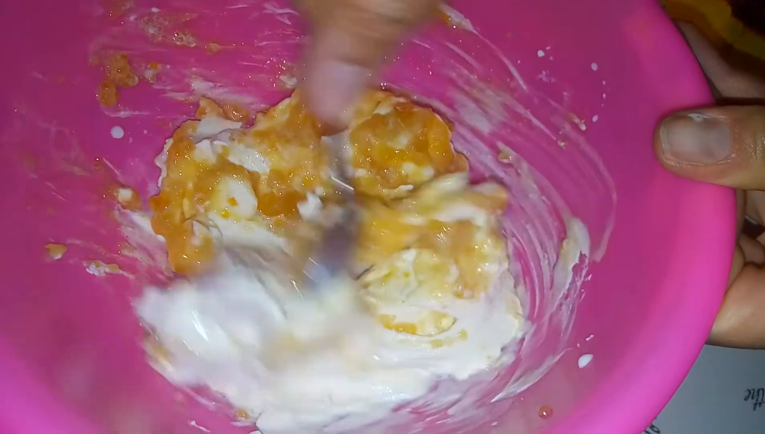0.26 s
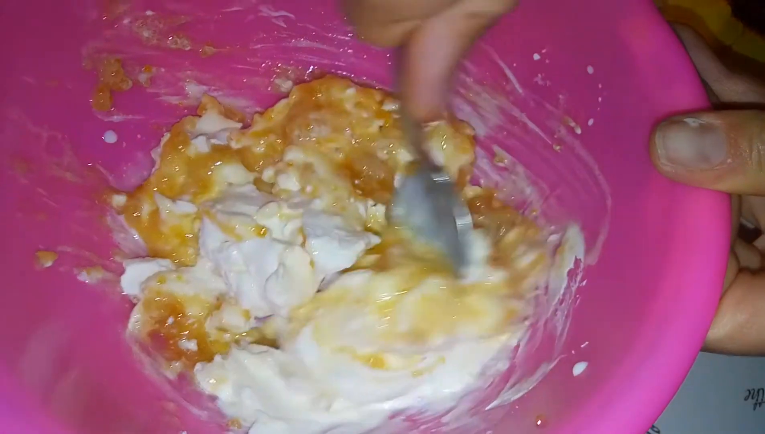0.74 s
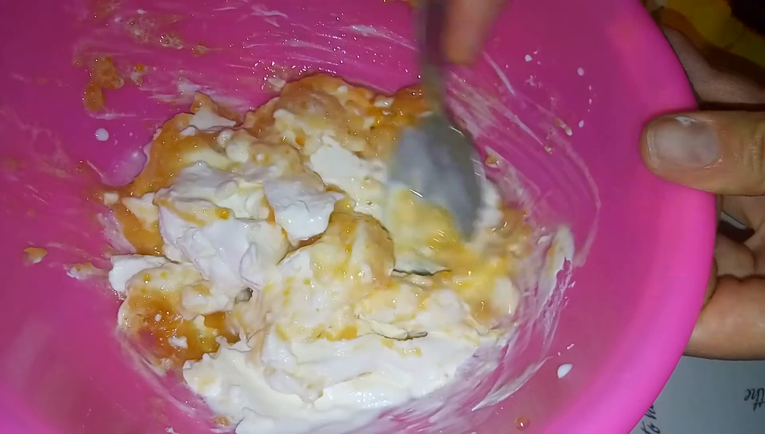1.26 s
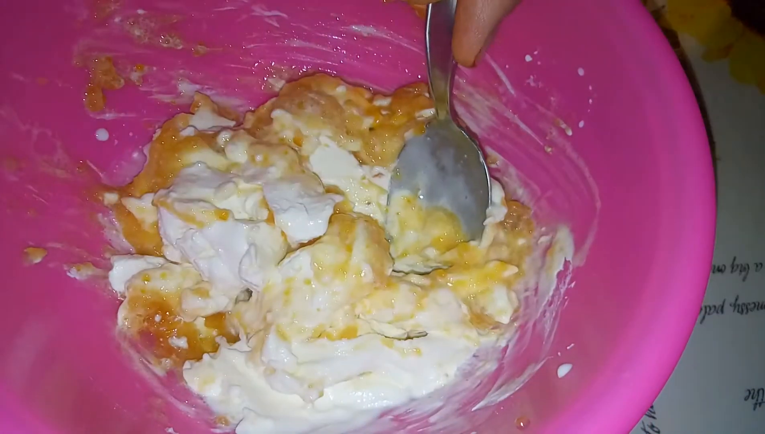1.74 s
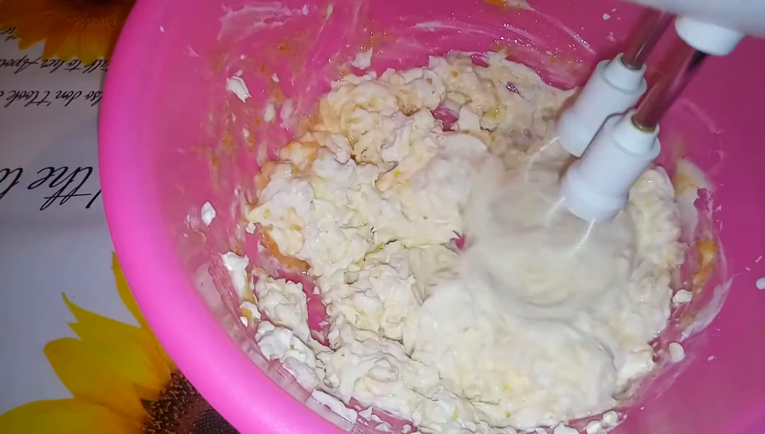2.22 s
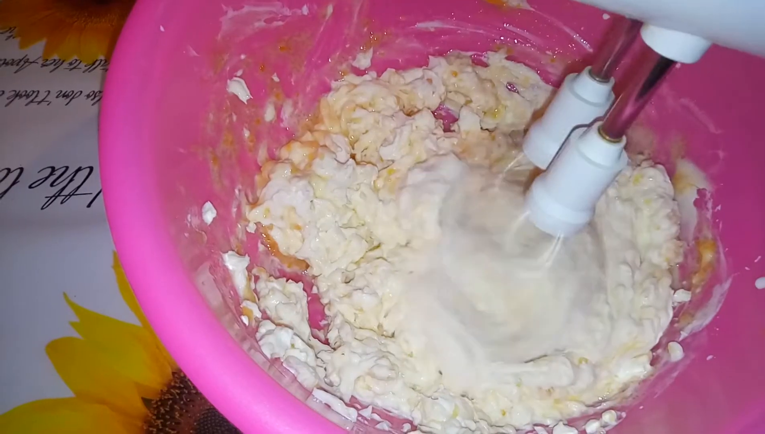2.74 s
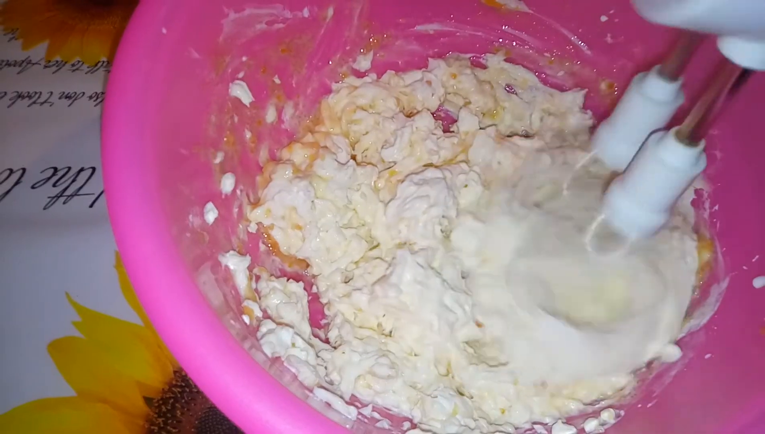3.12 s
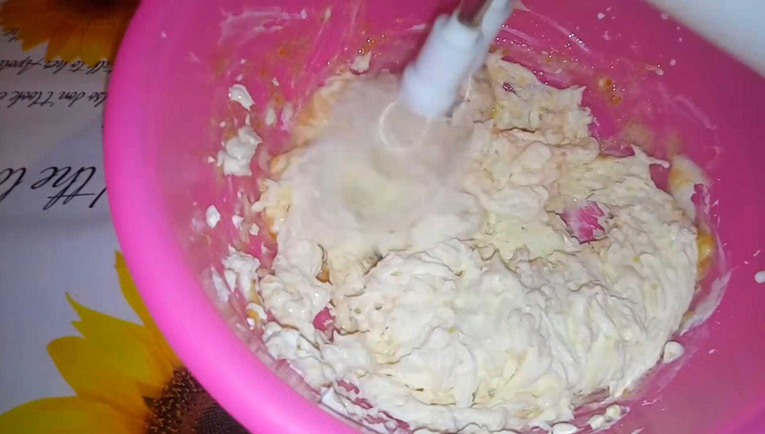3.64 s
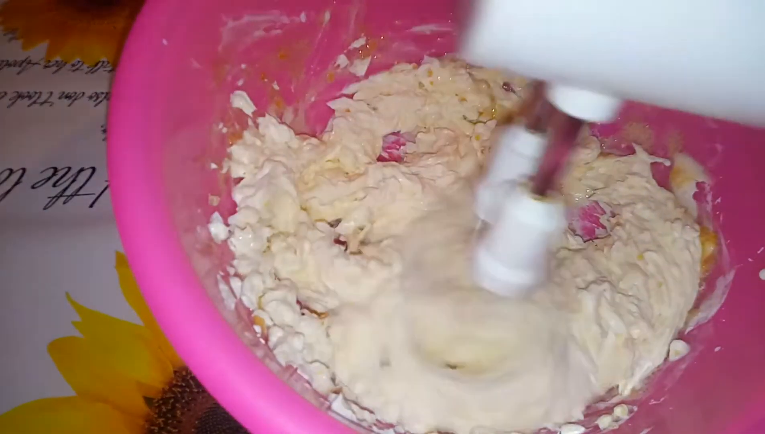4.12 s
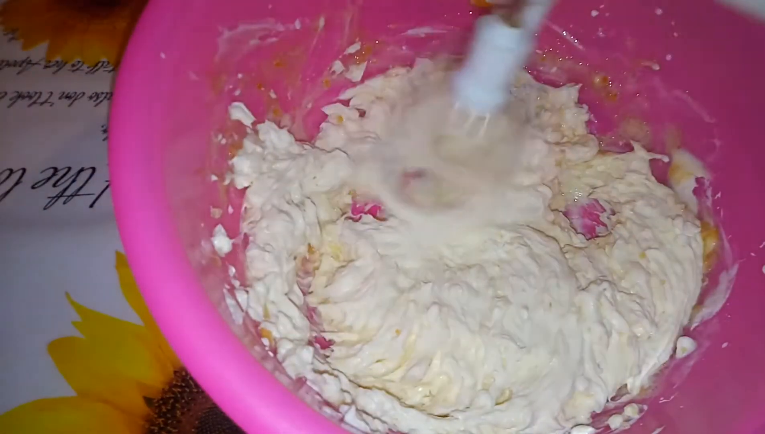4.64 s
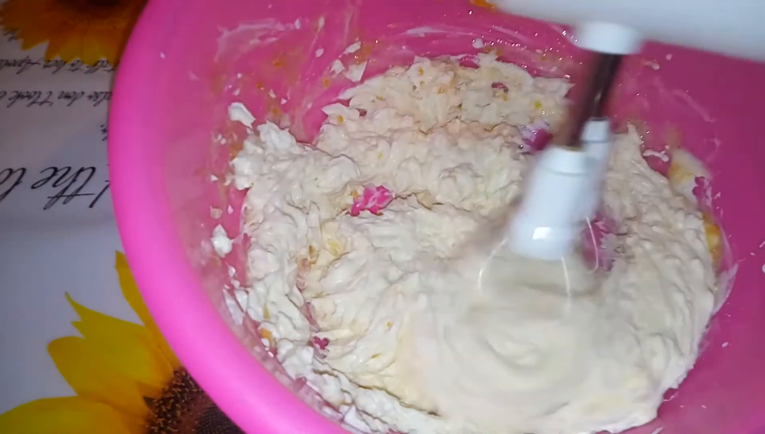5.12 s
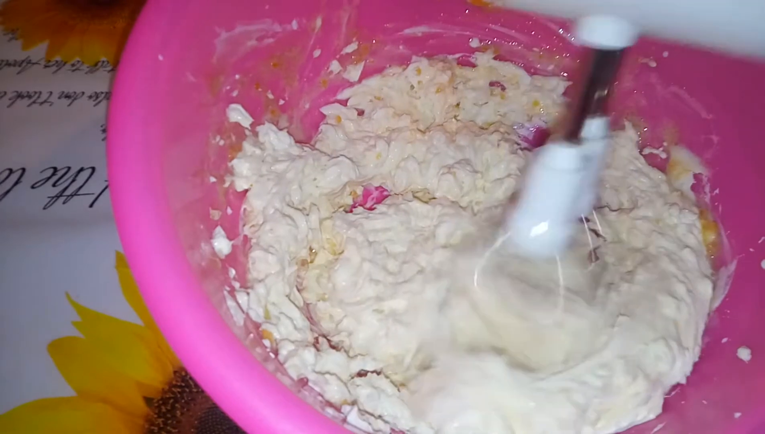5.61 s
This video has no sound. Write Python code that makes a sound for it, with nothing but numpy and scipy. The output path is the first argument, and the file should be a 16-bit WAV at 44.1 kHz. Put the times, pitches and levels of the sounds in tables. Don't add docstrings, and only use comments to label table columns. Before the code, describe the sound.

Quiet sticky stirring in a plastic bowl, then an abrupt electric mixer roar, a switch click, a rising whine, and low gusts buffeting the microphone.

```python
import sys
import numpy as np
from scipy import signal
from scipy.fft import rfft, irfft
from scipy.io import wavfile
from scipy.ndimage import uniform_filter1d

SR = 44100
rng = np.random.default_rng(int(sys.argv[2]) if len(sys.argv) > 2 else 0)


def persist_wave(psi):
    counts = np.round(np.clip(psi, -1, 1) * 32767).astype(np.int16)
    wavfile.write(sys.argv[1], SR, np.atleast_2d(counts).T)


def amplitude_ratio(level_db):
    exponent = np.asarray(level_db, float) / 20
    return 10 ** exponent


N = 258867
TIME_S = np.arange(N) / SR


def evened(x):
    return x / np.sqrt(np.mean(x ** 2) + 1e-20)


def read(points, hz):
    f, value = np.transpose(points)
    return np.interp(np.log(hz + 1), np.log(f + 1), value)


def controls(rows):
    s, *columns = np.transpose(rows)
    is_open = (TIME_S > s[0]) & (TIME_S <= s[-1] + 0.003)
    gate = uniform_filter1d(is_open * 1.0, size=200)
    return gate, [np.interp(TIME_S, s, c) for c in columns]


def noise():
    return rng.standard_normal(N)


def coloured(x, points):
    gain = amplitude_ratio(read(points, np.fft.rfftfreq(N, 1 / SR)))
    return evened(irfft(rfft(x) * gain, N))


def resonate(x, hz, width_hz):
    turn = np.exp(2j * np.pi * np.cumsum(hz * np.ones(len(x))) / SR)
    r = np.exp(-np.pi * width_hz / SR)
    return 2 * (turn * signal.lfilter([1 - r], [1, -r], x / turn + 1e-18)).real


def wander(hz):
    return evened(signal.sosfilt(signal.butter(2, hz, fs=SR, output="sos"), noise()))


def tone(hz, db, rough=0.0):
    turns = np.cumsum(hz * np.ones(N)) / SR + rng.random() + 0.11 * rough * wander(36)
    return np.sqrt(2) * amplitude_ratio(db + 2.7 * rough * wander(40)) * np.sin(2 * np.pi * turns)


# pitch_hz, density_db_per_hz
AIR = [(20, -25.5), (60, -16.5), (130, -14), (385, -28.5), (800, -30.5), (1400, -35), (3500, -38.5),
       (6000, -41.5), (7500, -48.5), (8200, -59.5), (9500, -110)]
# pitch_hz, level_db
FRIDGE = [(593, -69), (1480, -76.5), (210, -71)]
AIR_DB, HUM_HZ, HUM_DB = -55.5, 100.7, -46
BEAT_S, BEAT_DIP_S, BEAT_DEPTH = 0.567, 0.26, 0.33


def kitchen():
    beat = 1 - BEAT_DEPTH * np.cos(2 * np.pi * (TIME_S - BEAT_DIP_S) / BEAT_S)
    hum = beat * tone(HUM_HZ, HUM_DB, 0.3)
    air = coloured(noise(), AIR)
    air = air - resonate(air, 92.7, 45)
    appliances = sum(tone(hz, db, 0.38) for hz, db in FRIDGE)
    return amplitude_ratio(AIR_DB + 0.4 * wander(4.4)) * air + hum + appliances


# time_s, level_db
SCRAPE = [
    (0.0, -52.5),
    (0.382, -74),
    (0.588, -54),
    (0.69, -59.5),
    (1.31, -58),
    (1.6, -63),
]


def scrape():
    gate, (db,) = controls(SCRAPE)
    grain = noise() * amplitude_ratio(2.0 * wander(150))
    cream = [(150, -60), (400, -8), (1500, -1.5), (3500, -2), (6000, -11), (7800, -50), (9000, -100)]
    return gate * amplitude_ratio(db - 6.0) * coloured(grain, cream)


# start_s, peak_db, ring_hz, width_hz, thud_rel_db
TICKS = [(0.1201, -44.5, 1880, 2500, 3), (0.131, -39.5, 3630, 1500, -2), (0.1714, -47, 4910, 2500, -22),
         (0.182, -39.5, 3420, 2000, -16), (0.2254, -42.5, 4330, 2500, -24),
         (0.3505, -37.5, 2740, 1300, -20), (0.37, -44, 2750, 1200, -17), (0.5208, -36, 3760, 1800, -27),
         (0.5422, -34.5, 4400, 2200, -36), (0.5909, -30.5, 3170, 2800, -22), (0.6674, -40, 5980, 2500, -17),
         (0.677, -33, 2050, 2600, -2), (0.694, -45, 3970, 2000, 1), (0.7842, -39.5, 2570, 1100, -20),
         (0.87, -40.5, 3500, 4000, -2), (0.8907, -41, 2600, 900, -9), (0.937, -41, 4800, 2800, -10),
         (1.049, -51, 3760, 900, -16), (1.0767, -38, 3500, 1400, -21), (1.1169, -47, 3450, 2500, -24),
         (1.173, -25, 3880, 1680, -35), (1.3525, -37.5, 3020, 1500, 2), (1.3724, -22.5, 1820, 2400, -15),
         (2.035, -44, 3000, 3500, 2)]
TICK_T60_S, TICK_RISE_S = 0.022, 0.00042
TICK_CLICK = 4.0


def ticks():
    out, t = np.zeros(N + 4000), np.arange(4000) / SR
    for s, db, hz, width, thud_db in TICKS:
        crack = rng.standard_normal(len(t)) * amplitude_ratio(-60 * t / TICK_T60_S) * np.minimum(t / TICK_RISE_S, 1)
        crack[8] += TICK_CLICK
        ring = resonate(resonate(crack, hz, width), hz, width)
        body = resonate(ring, hz, 2 * width) + 0.056 * crack
        thud = resonate(resonate(crack, 890, 1600), 890, 1600)
        sound = body / abs(body).max() + amplitude_ratio(thud_db) * thud / abs(thud).max()
        out[round(s * SR):][:len(t)] += amplitude_ratio(db) * sound
    return signal.sosfilt(signal.butter(6, 7000, fs=SR, output="sos"), out[:N])


# pitch_hz, t60_s
KITCHEN = [(500, 0.22), (1300, 0.16), (2300, 0.17), (3800, 0.14), (7000, 0.064)]


def room(x):
    taps = np.zeros(SR // 2)
    at = np.arange(150, SR // 2 - 20, 20)
    taps[at + rng.integers(0, 20, len(at))] = rng.choice([-1.0, 1.0], len(at))
    hz, t, z = signal.stft(taps, SR, nperseg=256)
    t60_s = np.clip(read(KITCHEN, hz), 0.05, 0.6)[:, None]
    tail = signal.istft(z * amplitude_ratio(-60 * t / t60_s), SR, nperseg=256)[1]
    return signal.fftconvolve(x, tail / np.linalg.norm(tail))[:N]


def echoes(taps):
    sway = 2 * np.pi * 2.92 * TIME_S
    return amplitude_ratio(-10.5) * (room(taps * np.cos(sway)) + room(taps * np.sin(sway)))


THUMP_CYCLES = 0.56


def shoves(events):
    out, t = np.zeros(N + 3000), np.arange(3000) / SR
    for s, db, hz in events:
        u = t * hz / THUMP_CYCLES
        cycles = np.sin(2 * np.pi * (hz * t * (1 - 6 * t) + rng.random()))
        out[round(s * SR):][:len(t)] += amplitude_ratio(db + 6) * u * np.exp(-u) * cycles
    return out[:N]


# start_s, peak_db, centre_hz
BUMPS = [
    (0.672, -38.5, 287),
    (1.274, -44, 500),
    (1.31, -37.5, 207),
    (1.342, -38, 260),
    (1.371, -42.5, 333),
]


def bumps():
    return shoves(BUMPS)


# time_s, shaft_hz, order_1_db, order_5_db
SLOW = [
    (2.06, 197.2, -37.5, -35.5),
    (2.3, 195.7, -41.5, -36),
    (2.5, 196.5, -46, -35.5),
    (2.64, 191, -52, -37.5),
    (2.72, 194, -57, -66),
]


def slow_whine():
    gate, (shaft_hz, first_db, fifth_db) = controls(SLOW)
    out = tone(shaft_hz, first_db, 0.27)
    out += tone(5 * shaft_hz, fifth_db, 0.65) + tone(10 * shaft_hz, fifth_db - 6, 0.65)
    out += sum(tone(k * shaft_hz, fifth_db - 8, 0.54) for k in range(13, 17))
    return gate * out


def shaft_speed():
    fast, (high_hz, *_) = controls(FAST)
    return (1 - fast) * controls(SLOW)[1][0] + fast * high_hz, fast


def patchy(x, depth_db):
    hz, t, z = signal.stft(x, nperseg=512)
    patches = uniform_filter1d(rng.standard_normal(z.shape), size=5, axis=0)
    patches = uniform_filter1d(patches, size=14, axis=1)
    return signal.istft(z * amplitude_ratio(depth_db * evened(patches)), nperseg=512)[1][:N]


# time_s, contact_0_to_1
CONTACT = [(2.06, 0), (2.75, 0.25), (3.0, .1), (3.15, 0.66), (3.3, 0.04), (3.45, 0.76), (4.15, 0.71),
           (4.43, .15), (4.92, 0.92), (5.2, 0.89), (5.4, .65), (5.55, 0.93), (5.87, 0.88)]
# pitch_hz, density_db_per_hz
ROAR_SLOW = [(40, -31), (100, -12), (195, 1.5), (290, -6), (670, -3.5), (1240, -12.5), (2100, -7.5),
             (3100, -1), (3600, -6), (4560, -3.5), (5200, -14.5), (7300, -25.5), (7900, -44), (8600, -100)]
# pitch_hz, density_db_per_hz
ROAR_FAST = [(40, -37.5), (140, -4.5), (300, -2), (461, -9.5), (836, -5.5), (1240, -11.5), (2110, -10.5),
             (2400, -4), (3420, -7), (4560, -6), (5200, -14), (7300, -28.5), (7900, -46), (8600, -100)]
# pitch_hz, width_hz, level_db
HOUSING = [(673, 60, 6), (2486, 270, 0.5), (3040, 500, -29.5), (4300, 2100, -10.5), (5460, 97, -1.5)]
# pitch_hz, density_db_per_hz
SLAP = [(300, -42.5), (700, -9.5), (1100, 0), (1700, -3), (2200, -5.5), (4000, -34.5), (6000, -110)]
GEAR = 4.33
LOADED_HZ = 280
SLOW_ROAR_DB, FAST_ROAR_DB = -28.5, -25.5
BREAK_S, BREAK_DB = 0.0072, -9.5
SLAP_DB, SLAP_DB_PER_HZ, SLAP_CONTACT_DB = -5, -0.0836, 3.5
BEAT_FREE, BEAT_CONTACT = 0.12, 0.13


def roar():
    gate, (contact,) = controls(CONTACT)
    shaft_hz, fast = shaft_speed()
    broken = np.exp(-((TIME_S - SWITCH[0] + BREAK_S) / BREAK_S) ** 2)
    db = SLOW_ROAR_DB + fast * (FAST_ROAR_DB - SLOW_ROAR_DB)
    db = db + BREAK_DB * broken + DUCK_DB * gust_strength()[1]
    turns = np.cumsum(shaft_hz) / SR
    blade_phase = (turns / GEAR + 0.06 * wander(20)) % 1
    blade = np.exp(-blade_phase / 0.22) * amplitude_ratio(1.4 * wander(30))
    blade = uniform_filter1d(blade, size=60)
    beat = BEAT_FREE + BEAT_CONTACT * contact
    throb = 1 + 0.093 * np.cos(2 * np.pi * turns) + beat * (evened(blade) - 0.6)
    fan = noise() * throb * amplitude_ratio(wander(13.1))
    fan = fan + sum(amplitude_ratio(d) * resonate(fan, hz, width) for hz, width, d in HOUSING)
    hiss = (1 - fast) * amplitude_ratio(3.0) * coloured(fan, ROAR_SLOW) + fast * amplitude_ratio(4.5) * coloured(fan, ROAR_FAST)
    slap_db = SLAP_DB + SLAP_DB_PER_HZ * np.maximum(shaft_hz - LOADED_HZ, 0) + SLAP_CONTACT_DB * contact
    slap = amplitude_ratio(slap_db) * coloured(noise() * throb, SLAP)
    return gate * amplitude_ratio(db) * patchy(hiss + slap, 0.91)


# blade_rate_multiple, level_db
DRONE = [(1, -38), (2, -38), (2.165, -35), (3, -35)]
DRONE_DB, DRONE_CONTACT_DB = -21.5, 29


def drone():
    gate, (contact,) = controls(CONTACT)
    blade_hz = shaft_speed()[0] / GEAR
    drone_db = DRONE_DB + DRONE_CONTACT_DB * contact + 2.7 * wander(14)
    return gate * sum(tone(k * blade_hz, db + drone_db, 0.75) for k, db in DRONE)


# start_s, length_s, level_db
GUSTS = [
    (3.611, 0.482, -11.5),
    (4.479, 0.352, -17.5),
]
GUST_RISE_S, GUST_FADE_DB = 0.015, -10
DUCK_DB = -5


def gust_strength():
    gain = np.zeros(N)
    for s, length, db in GUSTS:
        u = (TIME_S - s) / length
        gain += ((u > 0) & (u < 1)) * amplitude_ratio(db + GUST_FADE_DB * np.clip(u, 0, 1) ** 2)
    rise = round(GUST_RISE_S * SR)
    press = (gain / gain.max()) ** 0.78
    return uniform_filter1d(gain, size=rise), uniform_filter1d(press, size=rise)


BUFFET_DB, BUFFET_CONTACT_DB, WIDE_SHARE = -38.5, 17, 0.44


def buffet():
    gate, (contact,) = controls(CONTACT)
    strength, press = gust_strength()
    air = noise() * amplitude_ratio((3.0 + 5.5 * press) * np.tanh(0.6 * wander(79)))
    deep = coloured(air, [(20, -27.5), (60, -5), (140, -2.5), (300, -10.0), (600, -59), (1200, -110)])
    wide = coloured(air, [(40, -25.5), (150, -10), (350, 18.0), (650, -0.5), (1100, -42), (2000, -110)])
    level = amplitude_ratio(BUFFET_DB + BUFFET_CONTACT_DB * contact) + strength * amplitude_ratio(1.3 * wander(11))
    return gate * level * amplitude_ratio(-7.5) * ((1 - WIDE_SHARE) * deep + WIDE_SHARE * wide)


# start_s, peak_db, t60_s
SWITCH = (2.6608, -9, .012)


def switch():
    s, db, t60_s = SWITCH
    t = np.maximum(TIME_S - s, 0)
    burst = noise() * (t > 0) * amplitude_ratio(np.maximum(-60 * t / t60_s, -150))
    band = signal.butter(7, [2400, 6000], "band", fs=SR, output="sos")
    snap = signal.sosfilt(band, burst) + amplitude_ratio(-39) * burst
    return amplitude_ratio(db) * snap / abs(snap).max()


# time_s, shaft_hz, order_8_db, order_16_db
FAST = [(2.68, 214, -52, -54), (2.75, 241.5, -28.5, -36.5), (2.86, 272, -27.5, -24.5),
        (2.99, 290.6, -25, -30), (3.15, 278.2, -25, -27), (3.4, 277.9, -27.5, -34.5),
        (3.55, 281.4, -40, -25.5), (3.94, 296, -20.5, -32.5), (4.16, 286.5, -28.5, -23.5),
        (4.27, 281.2, -27.5, -43), (4.43, 290.6, -28.5, -23), (4.59, 296.9, -20, -36),
        (4.68, 306.2, -25.5, -28.5), (4.81, 306.8, -20.5, -34), (4.99, 296.2, -21.5, -24.5),
        (5.17, 280.6, -29, -37.5), (5.75, 279.4, -30, -31.5), (5.87, 285, -28.5, -35.5)]
# order, followed_order, relative_db
SIDE_ORDERS = [(4, 3, -12), (20, 16, -24), (24, 8, -36)]
# order, loaded_db, slope_db_per_hz
GROWL = [(2, -31.5, -0.1641), (3, -33, -0.3)]
GROWL_IN_S = 0.044
SHAFT_DB, SHAFT_DB_PER_HZ = -44, 0.4932
SPIN_UP_DB = -36
SHELL_HZ, SHELL_WIDTH_HZ, SHELL_DB = 680, 35, 14.5


def fast_whine():
    gate, (shaft_hz, vent_8_db, vent_16_db) = controls(FAST)
    shaft_hz = uniform_filter1d(shaft_hz, size=3000)
    lift_hz = np.maximum(shaft_hz - LOADED_HZ, 0)
    climb_hz_per_s = np.gradient(shaft_hz) * SR
    blur_db = -0.045 * np.maximum(climb_hz_per_s - 200, 0)
    climbing = np.clip(climb_hz_per_s / 300, 0, 1) ** 2
    out = (amplitude_ratio(SHAFT_DB + SHAFT_DB_PER_HZ * lift_hz) + amplitude_ratio(SPIN_UP_DB) * climbing) * tone(shaft_hz, 0, 0.47)
    since_s = np.maximum(TIME_S - FAST[0][0], 0)
    growl_db = DUCK_DB * gust_strength()[1] + blur_db - 18 * np.exp(-since_s / GROWL_IN_S)
    level_db = {8: vent_8_db, 16: vent_16_db}
    for k, db, slope in GROWL:
        flare_db = SHELL_DB * np.exp(-((k * shaft_hz - SHELL_HZ) / SHELL_WIDTH_HZ) ** 2)
        level_db[k] = db + slope * lift_hz + growl_db + 1.4 * wander(4.41) + flare_db
    out += sum(tone(k * shaft_hz, db, 0.64) for k, db in level_db.items())
    out += sum(tone(k * shaft_hz, level_db[lead] + db, 1.0) for k, lead, db in SIDE_ORDERS)
    return gate * out


# start_s, length_s, level_db
KNOCKS = [
    (3.145, 0.52, -25),
    (4.191, .25, -27),
    (5.205, 0.18, -20),
    (5.442, 0.4, -16.5),
]
# pitch_hz, width_hz, level_db
WALL = [(1590, 760, 4), (2000, 890, -4), (1186, 680, -4.5), (3500, 2000, -8)]
KNOCK_SPREAD_DB, KNOCK_DECAY_S = 2.5, 0.0011


def knocks():
    passes, hits = np.cumsum(shaft_speed()[0]) / SR / GEAR, np.zeros(N)
    for s, length, db in KNOCKS:
        whole = np.floor(passes - passes[round(s * SR)])
        is_pass = np.diff(whole, prepend=0) > 0
        hits += amplitude_ratio(db) * is_pass * (TIME_S >= s) * (TIME_S < s + length)
    hits = hits * amplitude_ratio(KNOCK_SPREAD_DB * np.tanh(wander(23.28)))
    burst = signal.lfilter([1], [1, -np.exp(-1 / (KNOCK_DECAY_S * SR))], hits)
    drive = burst * np.sign(noise())
    wall = sum(amplitude_ratio(db) * resonate(resonate(drive, hz, width), hz, width) for hz, width, db in WALL)
    return amplitude_ratio(12.0) * signal.sosfilt(signal.butter(8, 5500, fs=SR, output="sos"), wall)


# start_s, peak_db, centre_hz
THUMPS = [(3.615, -24, 275), (3.649, -7.5, 180), (3.672, -16, 187), (3.693, -16, 260), (3.711, -5, 327),
          (3.738, -12, 205), (3.76, -10, 163), (3.777, -9, 208), (3.796, -6, 200.8), (3.815, -5.5, 134),
          (3.839, -15, 143), (3.863, -15, 210), (3.878, -19, 165.8), (3.915, -12, 164), (3.938, -5.5, 137),
          (3.967, -4, 169), (3.993, -8, 232), (4.025, -7, 139), (4.074, -13, 165), (4.488, -13, 248),
          (4.505, -9, 148.2), (4.549, -7, 197), (4.566, -9, 254.4), (4.601, -7.5, 162), (4.643, -9, 121),
          (4.669, -6, 281), (4.717, -9.5, 349), (4.749, -15, 285), (4.789, -23, 200), (4.822, -16, 266)]
# start_s, peak_db, centre_hz
SPIKES = [
    (3.809, -7, 510),
    (3.652, -13, 600),
    (4.672, -11, 560),
    (4.562, -13, 480),
]


def gust_thumps():
    return shoves(THUMPS) + shoves(SPIKES)


def scene():
    taps = ticks()
    spoon = scrape() + taps + echoes(taps) + bumps()
    motor = slow_whine() + roar() + switch() + fast_whine()
    beaters = drone() + knocks()
    wind = buffet() + gust_thumps()
    mono = kitchen() + spoon + motor + beaters + wind
    return np.array([mono, mono])


def top_cut(x):
    return signal.sosfilt(signal.butter(12, 15590, fs=SR, output="sos"), x)


# pitch_hz, density_db_per_hz
SHEEN = [(6500, -21.5), (8000, -3.5), (10500, -11), (13500, -22), (14700, -14.5), (15500, -6)]


def record(dry):
    edge = signal.lfilter([1, -1], [1], dry[0])
    loud = np.sqrt(abs(uniform_filter1d(edge ** 2, size=300)))
    fizz = amplitude_ratio(-30) * loud * coloured(noise(), SHEEN)
    top = [(6000, -65), (7500, -14.0), (8000, -10.5), (13800, -10), (14700, -0.5), (15600, 0)]
    hiss = amplitude_ratio(-70) * coloured(noise(), top)
    return top_cut(1.5 * np.tanh(dry / 1.5) + fizz + hiss)


dry = scene()
out = record(dry)
persist_wave(out)
```